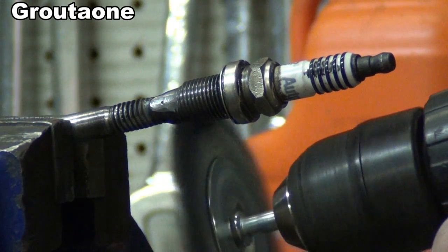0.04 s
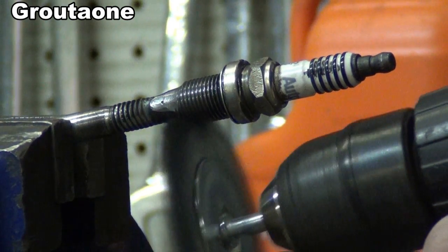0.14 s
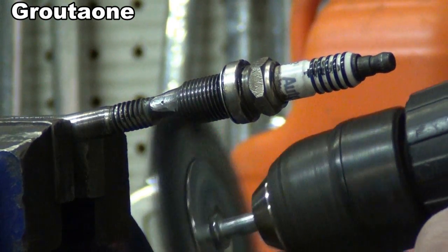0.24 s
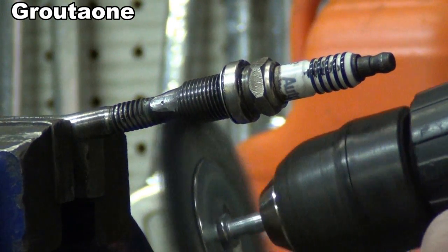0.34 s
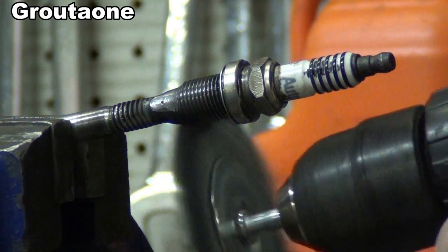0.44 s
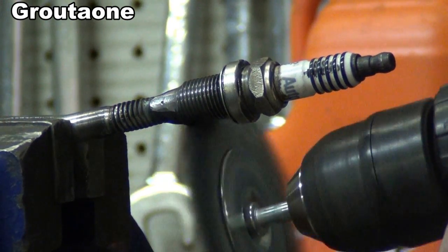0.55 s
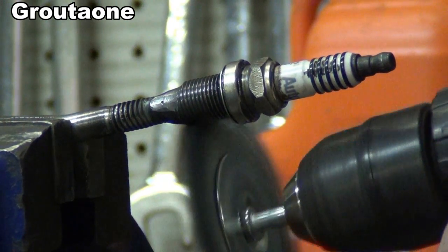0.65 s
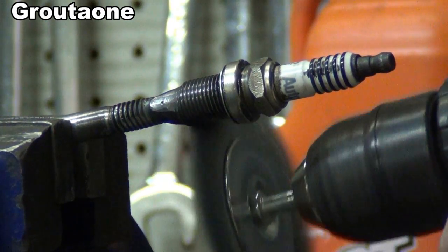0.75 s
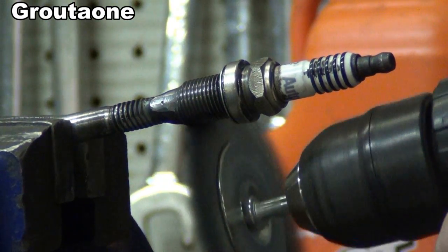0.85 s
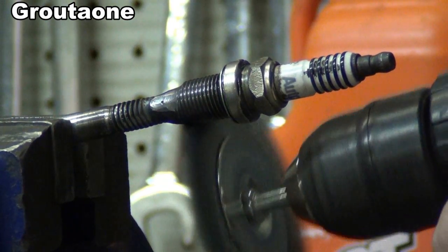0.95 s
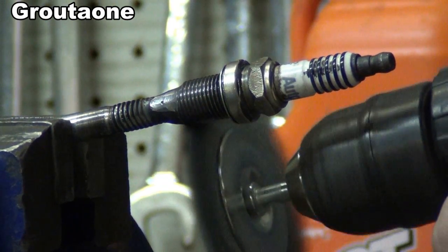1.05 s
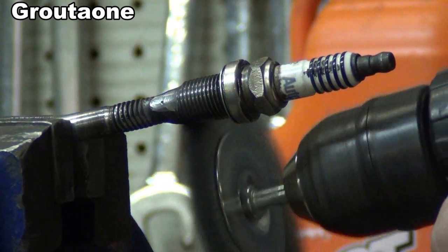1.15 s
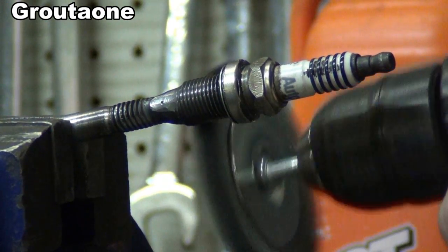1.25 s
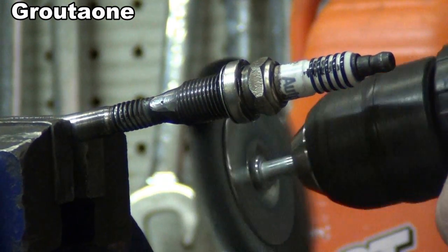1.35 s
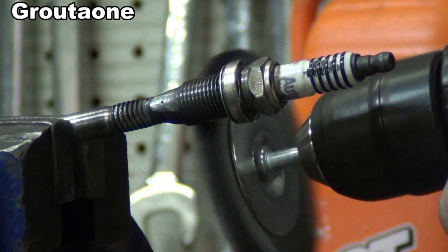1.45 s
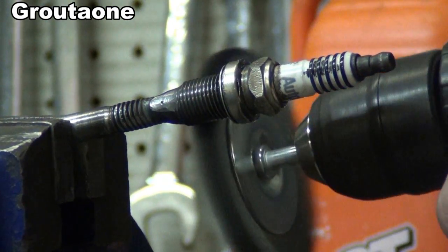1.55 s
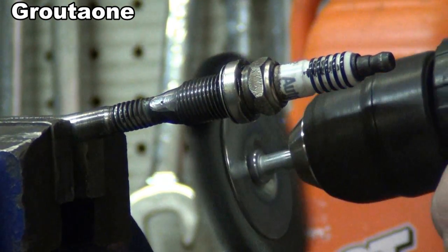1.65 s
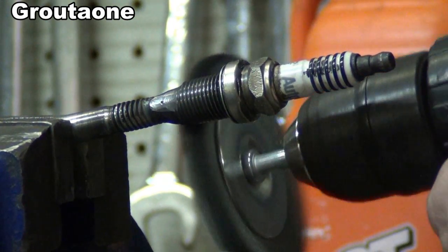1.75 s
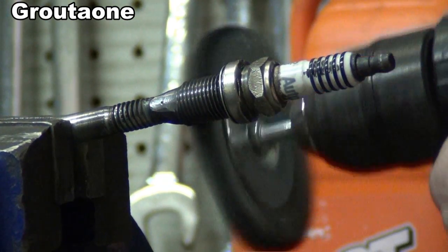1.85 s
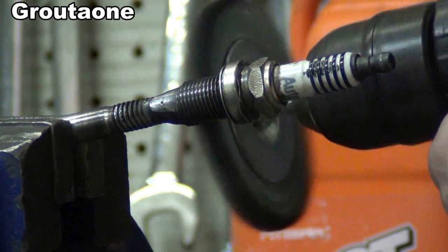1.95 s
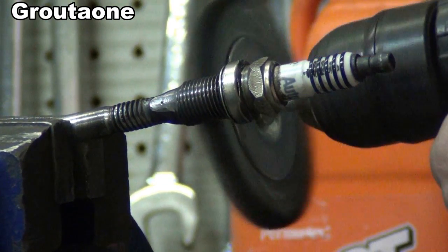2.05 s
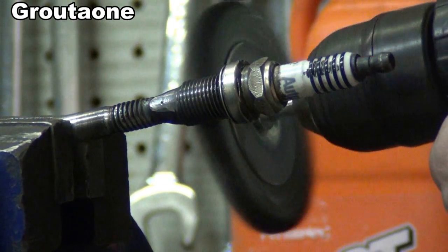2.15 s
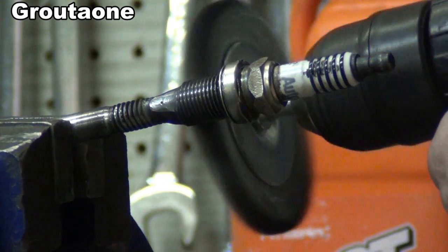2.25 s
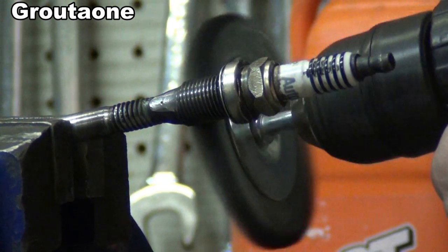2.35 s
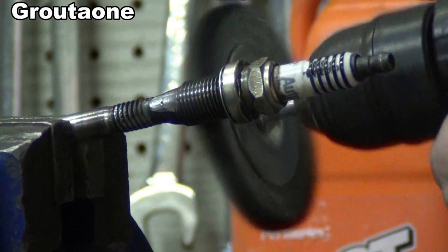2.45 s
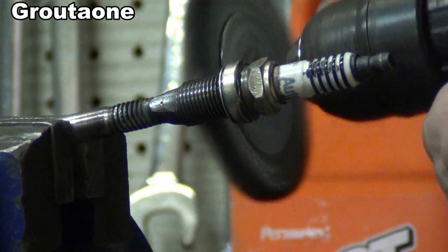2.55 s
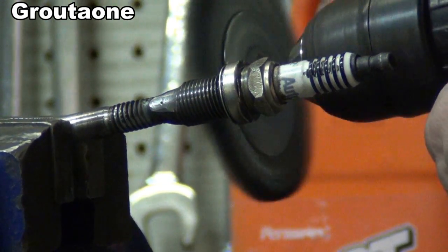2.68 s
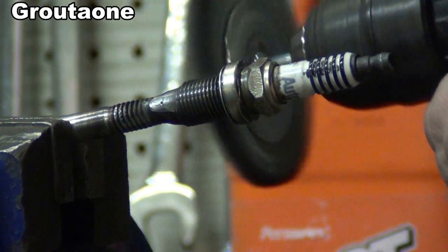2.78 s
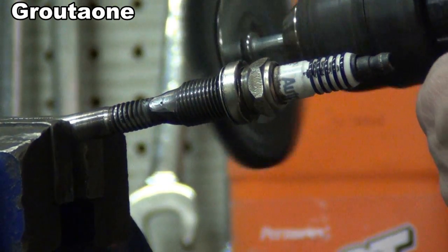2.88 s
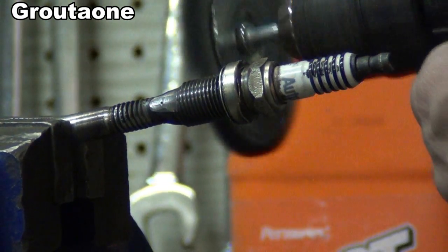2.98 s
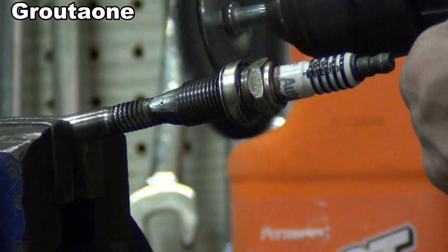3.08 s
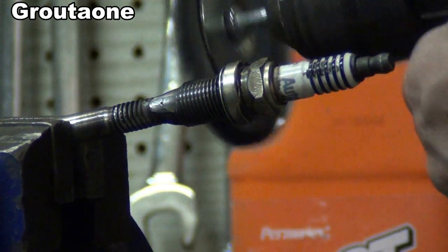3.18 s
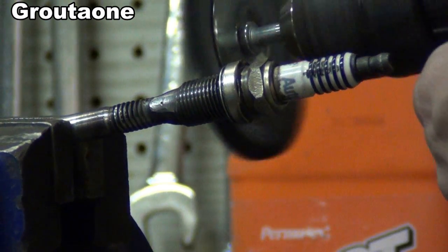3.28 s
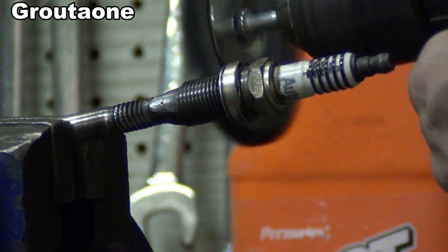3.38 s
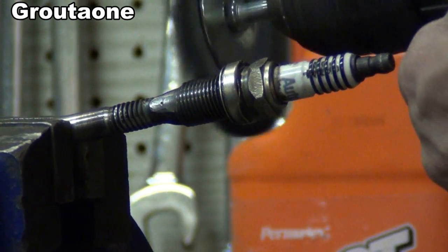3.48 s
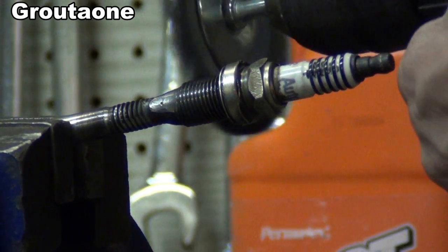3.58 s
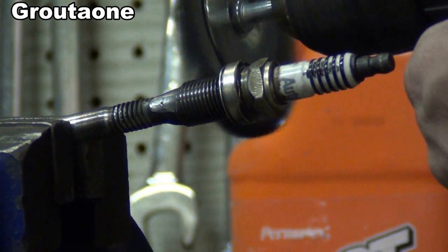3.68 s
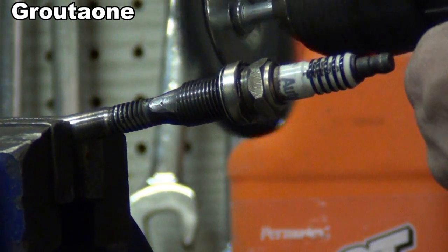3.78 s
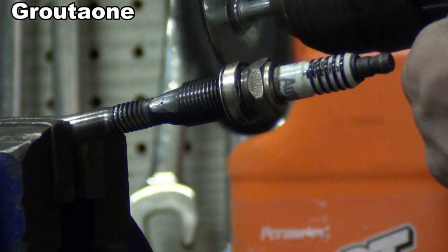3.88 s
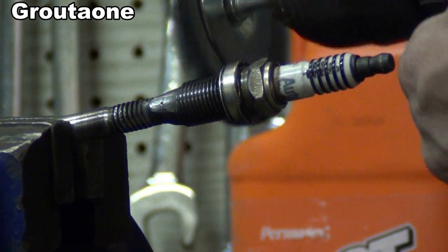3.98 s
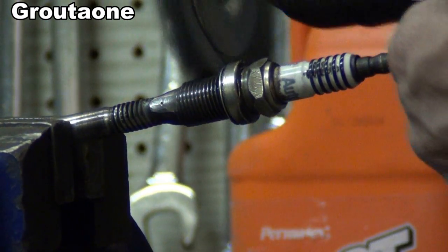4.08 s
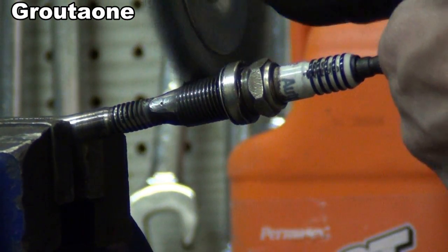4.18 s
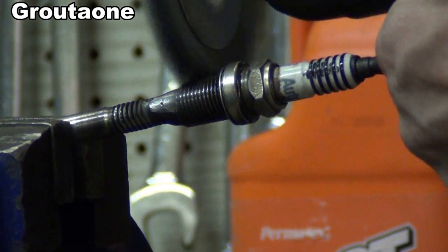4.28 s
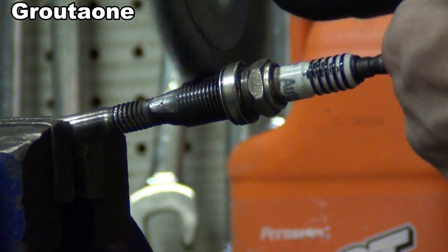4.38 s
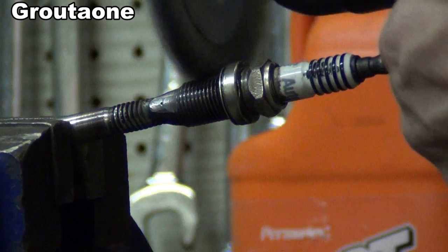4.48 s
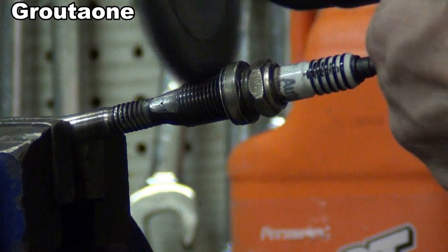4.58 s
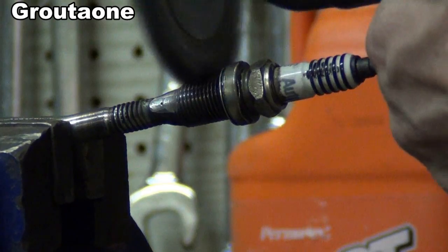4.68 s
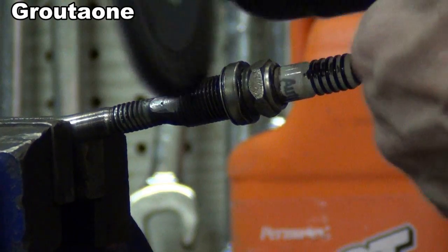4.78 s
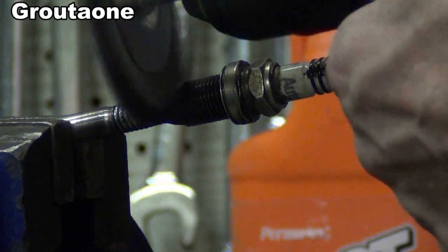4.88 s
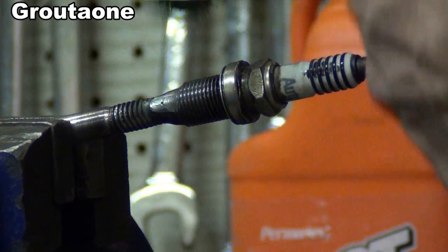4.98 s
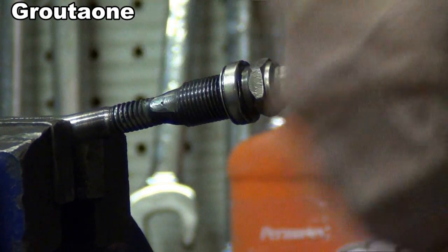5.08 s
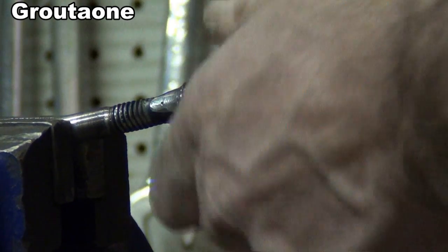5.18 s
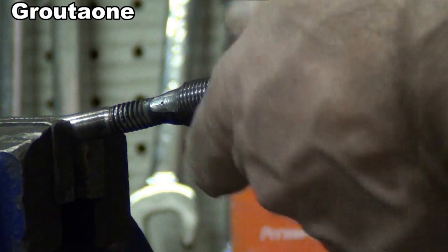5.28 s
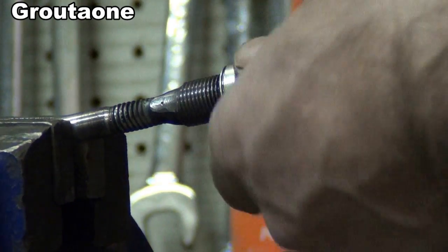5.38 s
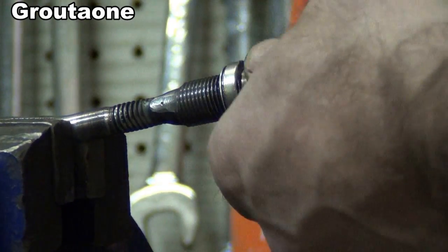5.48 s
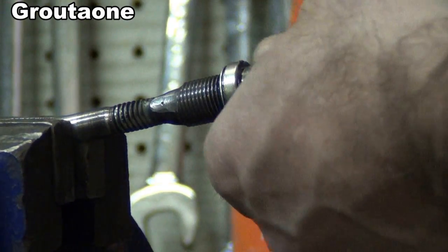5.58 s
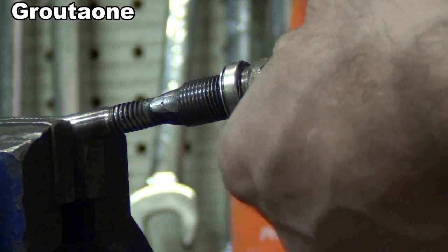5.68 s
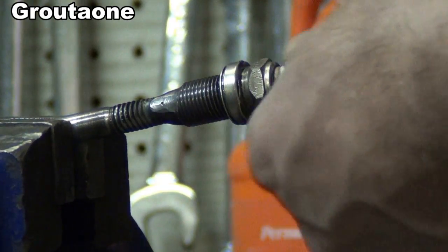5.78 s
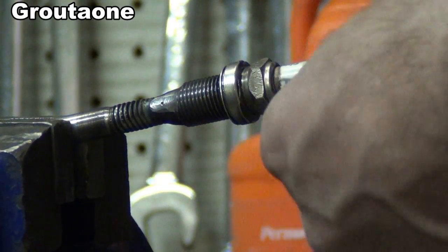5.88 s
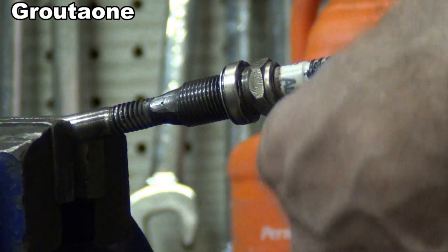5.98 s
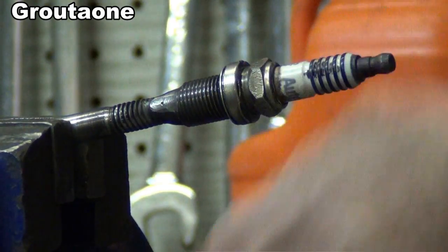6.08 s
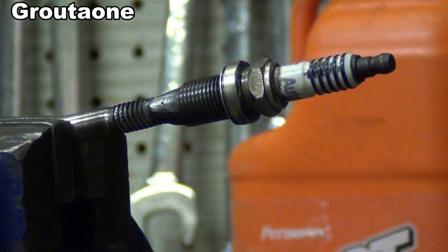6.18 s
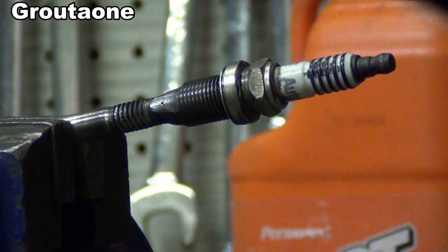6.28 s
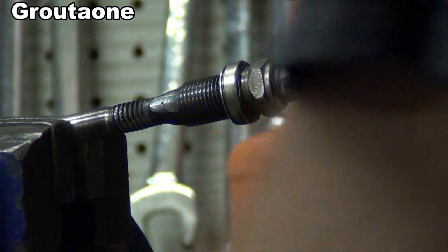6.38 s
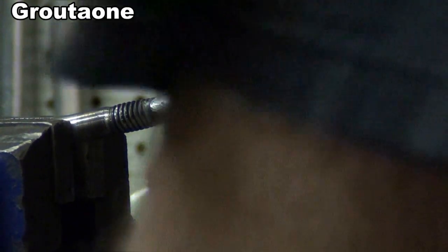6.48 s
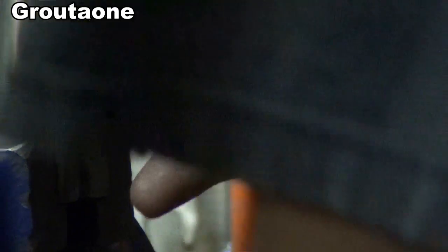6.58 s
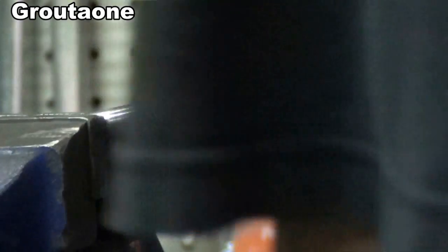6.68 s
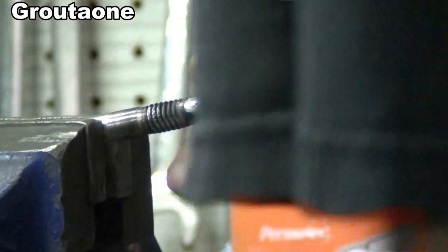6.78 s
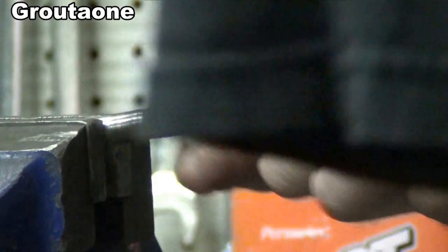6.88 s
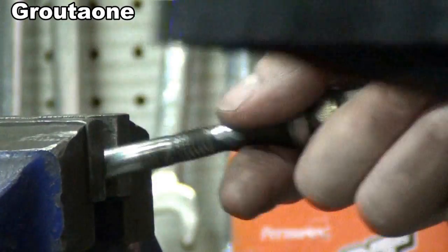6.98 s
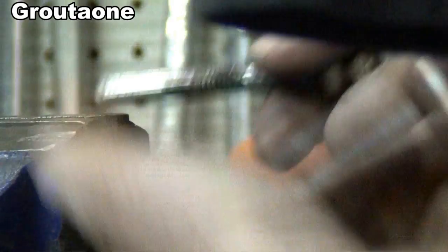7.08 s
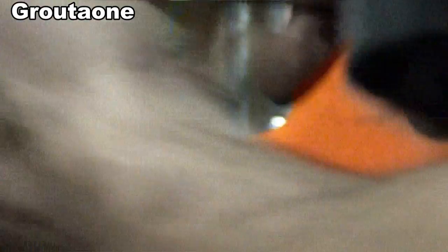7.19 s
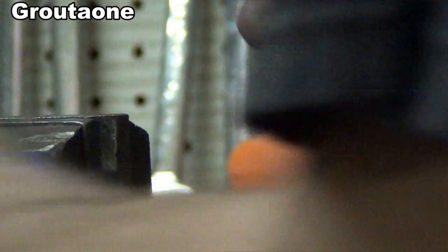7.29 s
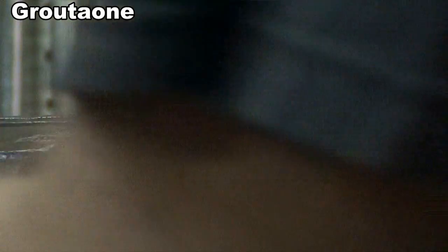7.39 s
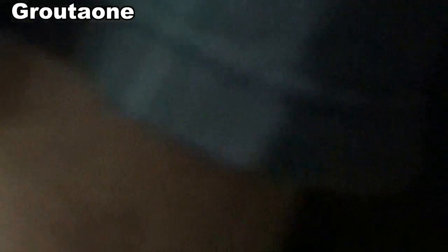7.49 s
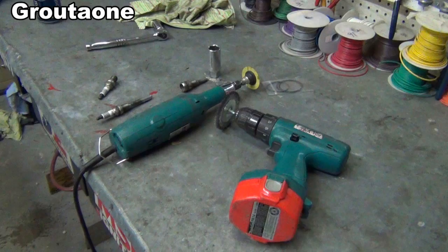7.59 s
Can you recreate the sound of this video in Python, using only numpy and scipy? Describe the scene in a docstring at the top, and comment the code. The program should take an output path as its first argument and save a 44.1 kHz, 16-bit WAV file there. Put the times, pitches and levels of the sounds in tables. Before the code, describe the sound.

In a small workshop, close up, a power drill runs at high speed with a wire wheel scratching steel threads. Its shrill whine and rushing noise sag in pitch at each press and recover. The motor cuts, the wheel scrapes a split second longer, then only faint machine hum remains. The drill is knocked down on the bench, followed by clacks, a sharp snap, thumps and a clanking steel vise.

```python
"""A power drill whines and scratches: its wire wheel spins against the threads of a spark plug in a vise.
The pitch sags each time the wheel is pressed on; then the trigger is let go and the drill runs out.
It is laid on the bench, things clack and thump in the small workshop, and the steel vise clanks open.
A machine hums faintly behind. Tones locked to the motor make the whine, shaped noise the rush and scratch;
each blow is a dying burst of noise, and the steel parts add ringing tones."""
import sys
import numpy as np
from scipy import signal
from scipy.fft import rfft, irfft
from scipy.io import wavfile

SR = 44100
rng = np.random.default_rng(int(sys.argv[2]) if len(sys.argv) > 2 else 0)


def put_to_file(sound):
    """Save the sound as 16-bit audio at rate SR, in the file named by the first command-line argument."""
    columns = np.atleast_2d(sound).T  # one column per channel
    safe = np.clip(columns, -1, 1)
    whole_steps = np.round(safe * 32767)
    wavfile.write(sys.argv[1], SR, whole_steps.astype(np.int16))


N = 336924
TIME = np.arange(N) / SR


def gain_of(db):
    """Turns decibels into a factor for the amplitude."""
    return 10 ** (np.asarray(db) / 20)


def evened(x):
    """Scales a sound to rms 1."""
    return x / np.sqrt(np.mean(x ** 2) + 1e-20)


def read(points, hz):
    """Reads a table between its points, along a log-frequency axis."""
    f, value = np.transpose(points)
    return np.interp(np.log(hz + 1), np.log(f + 1), value)


def curve(rows, column=1):
    """Draws one column of a timed table as straight lines, at every sample."""
    rows = np.array(rows)
    return np.interp(TIME, rows[:, 0], rows[:, column])


def add(mix, s, sound):
    """Mixes a sound in at a given second."""
    part = mix[round(s * SR):][:len(sound)]
    part += sound[:len(part)]


def coloured(x, points, tilt=0):
    """Filters x by a spectrum, tilted in dB per octave (gently below 300 Hz), and scales it to rms 1."""
    hz = np.fft.rfftfreq(len(x), 1 / SR)
    gain = gain_of(read(points, hz) + tilt * np.log2(1 + hz / 300))
    return evened(irfft(rfft(x) * gain, len(x)))


def wander(hz):
    """Random drift of rms 1 that changes up to about the given rate."""
    f = np.fft.rfftfreq(N, 1 / SR)
    return evened(irfft(rfft(rng.standard_normal(N)) * np.exp(-(f / hz) ** 2), N))


def ramp(start_s, length_s):
    """A smooth step from 0 to 1."""
    u = np.clip((TIME - start_s) / length_s, 0, 1)
    return u * u * (3 - 2 * u)


def tone(turns, order, flutter, flutter_hz):
    """A tone of so many cycles per turn; random changes of size and phase make it flutter."""
    sway = 1 + flutter * (wander(flutter_hz) + 1j * wander(flutter_hz))
    return evened((sway * np.exp(2j * np.pi * order * turns)).real)


# how long the room's echo takes to fall by 60 dB: (f/Hz, time/s)
ROOM_DECAY = [(100, .36), (500, .45), (2000, .5), (5000, .44), (10000, .32), (15000, .22)]


def room(x, wet_db):
    """Adds a tail of scattered echoes whose treble dies first, balanced to keep the power."""
    size = SR * 3 // 4
    echoes = rng.random(size) < 6000 / SR  # about 6000 echoes per second
    late = np.arange(size) > .003 * SR
    taps = rng.standard_normal(size) * echoes * late
    hz, t, z = signal.stft(taps, SR, nperseg=256)
    decay = gain_of(-60 * t / read(ROOM_DECAY, hz)[:, None])
    tail = signal.istft(z * decay, SR, nperseg=256)[1]
    wet = gain_of(wet_db)
    echoed = signal.fftconvolve(x, tail / np.linalg.norm(tail))[:N]
    return (x + wet * echoed) / np.sqrt(1 + wet ** 2)


# colour of the room air: (f/Hz, level/dB per Hz)
AIR_COLOUR = [(15, -40), (35, 5), (55, -0.5), (150, -0.5), (300, 0.5), (400, -1), (550, -3), (900, 3.5),
              (1200, -1), (2000, -6.5), (2600, -8), (5000, -13.5), (8000, -17.5), (10500, -16),
              (15500, -24)]
# steady hum of the distant machine: (f/Hz, level/dB)
MACHINE_HUM = [(120, -64.5), (360.5, -54.5), (479.3, -54), (808, -61), (910, -55.5)]


def shop(air_db=-44, chirp_db=-56, chirp_hz=1992, shaft_hz=30):
    """Room air is shaped noise; a distant machine hums in steady tones and chirps once in each turn."""
    hum = sum(gain_of(db) * evened(np.sin(2 * np.pi * hz * TIME + 0.36 * wander(5.4)))
              for hz, db in MACHINE_HUM)
    rub = np.exp(2 * np.cos(2 * np.pi * shaft_hz * TIME))  # one peak per turn
    chirp = gain_of(chirp_db) * evened(rub * tone(TIME, chirp_hz, flutter=0.98, flutter_hz=60.5))
    air = gain_of(air_db) * coloured(rng.standard_normal(N), AIR_COLOUR)
    return hum + chirp + air


# hand and sleeve sliding over the tools: (loudest at t/s, level/dB, swell/s, fade/s)
SLIDE_STROKES = [(6.031, -36.5, 0.17, 0.08), (6.805, -33, 0.038, .03)]
# colour of the rub: (f/Hz, level/dB per Hz)
SLIDE_COLOUR = [(200, -1), (900, 2.5), (2500, -4), (5500, -6), (7800, -15), (10500, -6), (15000, -33)]


def slides():
    """Each slide of hand and sleeve is a grainy rub that swells and fades."""
    strokes = np.zeros(N)
    for s, db, swell, fade in SLIDE_STROKES:
        side_s = np.where(TIME < s, swell, fade)
        strokes += gain_of(db) * np.exp(-((TIME - s) / side_s) ** 2)
    grain = gain_of(2 * wander(150))
    return strokes * coloured(rng.standard_normal(N) * grain, SLIDE_COLOUR)


def blows(rows, colour, modes=(), ring_db=0, ring_s=.4, damping_hz=3000):
    """Each blow is a dying burst of contact noise; its tilt brightens or dulls the burst and the ringing."""
    out, t = np.zeros(N), np.arange(SR // 2) / SR
    for s, db, tilt, contact_s in rows:
        sound = coloured(rng.standard_normal(len(t)), colour, tilt) * np.exp(-t / contact_s)
        if len(modes):
            hz, mode_db = np.transpose(modes)[:, :, None]
            size = gain_of(mode_db + tilt * np.log2(hz))
            t60 = ring_s / (1 + hz / damping_hz)  # high modes die first
            # a loose part rings a little differently each time
            loose = hz * (1 + 0.00074 * rng.standard_normal(hz.shape))
            wave = np.sin(2 * np.pi * (loose * t + rng.random(hz.shape)))
            ring = (size * gain_of(-60 * t / t60) * wave).sum(0) / np.linalg.norm(size)
            # the ring builds up while the contact lasts
            sound += gain_of(ring_db) * ring * (1 - np.exp(-4 * t / contact_s))
        add(out, s, gain_of(db) * sound)
    return out


# the drill touching the bench: (t/s, level/dB, tilt/dB per octave, contact/s)
SET_DOWN_BLOWS = [(5.657, -12.5, 1.5, 0.035), (5.686, -9, 5, 0.0075), (5.705, -13.5, -4.5, 0.032),
                  (5.731, -13.5, 10, .002), (5.751, -16, 3, 0.013)]
# its colour: (f/Hz, level/dB per Hz)
SET_DOWN_COLOUR = [(40, -26), (80, -18), (120, -13), (190, -18), (263, 8.5), (321, -12), (420, -3),
                   (880, -3), (1100, -7), (2640, -16), (7300, -30), (10100, -29), (15000, -49)]


def set_down():
    """The drill is laid on the bench: several noise bursts in a row."""
    return room(blows(SET_DOWN_BLOWS, SET_DOWN_COLOUR), wet_db=-5.5)


# thumps: (t/s, level/dB, tilt/dB per octave, contact/s)
THUMP_BLOWS = [(6.794, -23, 9, 0.0084), (6.802, -15, 6.5, 0.019), (6.814, -7.5, -3, 0.0038),
               (6.821, -7.5, -0.5, 0.031), (6.85, -20, 0, 0.11)]
# their colour: (f/Hz, level/dB per Hz)
THUMP_COLOUR = [(15, -46), (30, -27), (48, 0), (100, -2), (160, -7), (230, 3.5), (350, 0), (500, -2.5),
                (811, -5), (1210, -8), (2430, -9.5), (3350, -22.5), (5570, -22.5), (7480, -37),
                (10000, -25.5), (15000, -63)]


def thumps():
    """Thumps: noise bursts with strong bass, fairly dry."""
    return room(blows(THUMP_BLOWS, THUMP_COLOUR), wet_db=-12)


# one snap: (t/s, level/dB, tilt/dB per octave, contact/s)
SNAP_BLOW = [(6.371, -7.5, 0, 0.019)]
# its colour: (f/Hz, level/dB per Hz)
SNAP_COLOUR = [(180, -67), (300, -35), (581, -37), (685, -25), (922, -26), (1030, -15), (1240, -12),
               (1540, -12), (1810, -4), (3130, -11), (5950, -3), (8140, -12.5), (10100, 1), (15500, -16)]


def snap():
    """A bright snap across the bench: more room echo than direct sound."""
    return room(blows(SNAP_BLOW, SNAP_COLOUR), wet_db=3)


# clacks: (t/s, level/dB, tilt/dB per octave, contact/s)
CLACK_BLOWS = [(5.921, -21.5, 2, 0.004), (5.988, -28.5, -5, 0.0035), (6.938, -13.5, -5.5, 0.0043),
               (7.0, -30, -6, .002), (7.202, -25, -8, 0.0011)]
# their colour: (f/Hz, level/dB per Hz)
CLACK_COLOUR = [(400, -9), (2200, -2), (3000, -3), (4400, 3), (7500, -8), (10500, -4), (15000, -22)]


def clacks():
    """Clacks: very short contacts without ringing."""
    return room(blows(CLACK_BLOWS, CLACK_COLOUR), wet_db=-6)


# clanks: (t/s, level/dB, tilt/dB per octave, contact/s)
CLANK_BLOWS = [(6.617, -20.5, -3.5, 0.0093), (6.634, -10.5, 1, 0.015)]
# their colour: (f/Hz, level/dB per Hz)
CLANK_COLOUR = [(150, -9), (600, -4), (1600, 2), (2300, 1.5), (3500, 3.5), (5800, -6), (7300, -9),
                (8300, -21), (10000, -5), (14000, -57)]
# ringing steel, before the tilt: (f/Hz, level/dB)
CLANK_MODES = [(841, 2), (882, -5), (1113, -21), (1580, -2), (1732, -5), (1893, 5.5), (2030, -8), (2730, 0),
               (2913, -5), (3172, -3), (3706, -5), (3917, -3), (5812, 6), (6390, -9)]


def clanks():
    """A loose steel tool is struck and rings briefly."""
    loose_tool = blows(CLANK_BLOWS, CLANK_COLOUR, CLANK_MODES, ring_db=4, ring_s=.13)
    return room(loose_tool, wet_db=-6.5)


# clinks: (t/s, level/dB, tilt/dB per octave, contact/s)
CLINK_BLOWS = [(7.073, -13, 0.0016, 0.0027), (7.082, -14.5, 0, 0.0049)]
# their colour: (f/Hz, level/dB per Hz)
CLINK_COLOUR = [(500, -33), (3000, -3), (4800, -16), (6100, 0), (7500, -13), (8900, 6), (11000, -4),
                (12500, -26)]
# ringing steel, before the tilt: (f/Hz, level/dB)
CLINK_MODES = [(6100, -15), (8850, 3), (10950, -1)]


def clinks():
    """High steel clinks: short contacts that wake a few high tones."""
    struck = blows(CLINK_BLOWS, CLINK_COLOUR, CLINK_MODES, ring_db=-0.5, ring_s=.2)
    return room(struck, wet_db=-12)


# blows of the vise handle: (t/s, level/dB, tilt/dB per octave, contact/s)
VISE_BLOWS = [(7.085, -21, -6, 0.035), (7.099, -15.5, -4, 0.01), (7.112, -12, 3, 0.012),
              (7.122, -10, -4, 0.017), (7.131, -9, 6, 0.004), (7.138, -11.5, -0.5, 0.0061)]
# their colour: (f/Hz, level/dB per Hz)
VISE_COLOUR = [(100, -40), (450, -27), (650, 7.5), (1400, 0), (1900, 7), (2700, -1.5), (4500, -8),
               (6200, -12), (7200, -10), (8400, -28), (9700, -11), (11500, -38), (14000, -52)]
# ringing steel, before the tilt: (f/Hz, level/dB)
VISE_MODES = [(312, -13), (627, 4.5), (652, -4.5), (890, -5), (931, -11), (1179, -16), (1212, -2.5),
              (1562, -1), (1586, -9), (1640, -4), (1689, -4), (1838, -2), (2166, 4.5), (2439, -10),
              (3063, -8), (3722, -5.5), (4237, -15), (4667, -13), (7100, -19), (9600, -14)]


def vise():
    """The steel vise clanks as it is opened: quick blows that ring many tones."""
    handle = blows(VISE_BLOWS, VISE_COLOUR, VISE_MODES, ring_db=5, ring_s=.19)
    return room(handle, wet_db=-3.5)


def bench():
    """All the handling noises together."""
    return set_down() + thumps() + snap() + clacks() + clanks() + clinks() + vise() + slides()


# the wheel is pressed on, then eased off:
# (start t/s, let-up t/s, sag of the motor/turns per second, time to ease off/s)
PRESSES = [(-.2, .41, 19.7, .17), (1, 1.34, 28, .13), (1.34, 1.7, 19.5, .13), (1.7, 1.83, 38, .32),
           (2.27, 3.08, 24.5, .14), (3.28, 3.41, 24, .14), (3.68, 4.1, 24, .14), (4.42, 4.64, 21, .14)]
BITE_S = .13  # time for the sag to set in


def sag():
    """Turns per second that the motor loses as the wheel is pressed on."""
    return sum(hz * ramp(start, BITE_S) * (1 - ramp(let_up, ease))
               for start, let_up, hz, ease in PRESSES)


# the wheel starts under the plug and climbs behind it: (t/s, share hidden 0-1)
HIDDEN = [(.55, 0.05), (1.5, 0.44), (2.3, 0.66)]


def level(rule, load, swell_db=0):
    """Gain that follows the load and the place of the wheel, and swells by chance in the unsteady hand."""
    free_db, loaded_db, hidden_db = rule
    steady_db = free_db + loaded_db * load + hidden_db * curve(HIDDEN)
    return gain_of(steady_db + swell_db * wander(3.6))


# fixed resonances of the housing and the clamped plug: (f/Hz, width/Hz before broadening, level/dB)
BODY_MODES = [(264, 18, -44), (370, 18, -38), (436, 30, -36), (615, 20, -38), (1240, 50, -33),
              (1480, 40, -38), (2200, 55, -34), (2738, 36, -29.5), (2950, 70, -33.5), (4130, 300, -28),
              (6280, 220, -33)]


def body(drive):
    """Vibration rings the fixed resonances of housing and plug."""
    f, spectrum = np.fft.rfftfreq(N, 1 / SR), rfft(drive)
    ringing = np.zeros(N)
    for hz, width, db in BODY_MODES:
        response = 1 / (1 + 1j * (f - hz) / (1.33 * width)) ** 2  # broadened by 1.33
        ringing += gain_of(db) * evened(irfft(spectrum * response, N))
    return ringing


# low tones as the drill is turned in the hand, before swells and load:
# (t/s, gear hum level/dB, third order level/dB, fourth order level/dB)
TONE_LEVELS = [(0, -31, -29.5, -32), (.65, -35, -30.5, -28), (1.15, -32, -28.5, -31.5),
               (1.45, -36, -51, -43), (1.9, -29, -36, -41), (2.05, -35.5, -22.5, -36),
               (2.7, -34.5, -26.5, -33), (4.05, -37, -26, -33), (4.4, -30, -28.5, -33)]
# weak shaft and gear tones: (multiple of the motor speed, level/dB)
WEAK_TONES = [(.855, -41), (1.025, -34), (3.485, -38), (4.845, -32.5), (5.16, -36), (7.015, -33)]
# whistle: (level/dB running free, dB added at full load, dB added behind the plug)
WHISTLE_LEVEL = (-25, 0, -2.4)
# multiples of the motor speed: gear hum, two motor orders, and the close pair of gear mesh and fan
GEAR_ORDER, THIRD_ORDER, FOURTH_ORDER, WHISTLE_ORDERS = 1.365, 2.99, 4.005, (9.7, 10)
FOURTH_LOAD_DB = 4.5  # the fourth order swells by this at full load


def whine(turns, wheel, load, beat=0.39, swell_db=1.16):
    """Gear hum, motor orders and fan whistle; motor and whistle beat with each turn of the wheel."""
    gear, third, fourth = (gain_of(curve(TONE_LEVELS, column=k) + swell_db * wander(4.3))
                           for k in (1, 2, 3))
    hum = gear * tone(turns, GEAR_ORDER, flutter=0.57, flutter_hz=14)
    motor = third * tone(turns, THIRD_ORDER, flutter=0.87, flutter_hz=30.4)
    fourth = fourth * gain_of(FOURTH_LOAD_DB * load)
    motor += fourth * tone(turns, FOURTH_ORDER, flutter=0.44, flutter_hz=25.6)
    # the fan and the gear mesh lie close together and fray
    strands = sum(tone(turns + .014 * wander(40), order, flutter=.6, flutter_hz=70)
                  for order in WHISTLE_ORDERS)
    whistle = level(WHISTLE_LEVEL, load, swell_db=0.16) * strands
    weak = sum(gain_of(db) * tone(turns, order, flutter=0.63, flutter_hz=27.7)
               for order, db in WEAK_TONES)
    return hum + (motor + whistle) * (1 + beat * wheel) + weak


# colours of the motor's rush, the wires' scratch and the shaking: (f/Hz, level/dB per Hz)
RUSH_COLOUR = [(150, -26), (260, -23.5), (400, -7), (700, -6), (1050, 2), (1400, -0.5), (2100, -3.5),
               (2450, -4), (2900, -1.5), (3500, -1.5), (4250, -0.5), (4900, -3.5), (6300, -2), (7200, -8.5),
               (12000, -16)]
SCRATCH_COLOUR = [(1000, -29), (4000, -19), (7300, -15), (8600, -8.5), (9700, -4), (10400, -2.5),
                  (11200, -4), (12000, -12), (13200, -12.5), (15700, -47.5)]
SHAKE_COLOUR = [(15, -48), (30, -26), (40, -5), (50, 0), (75, -23), (120, -1), (200, -7.5), (400, -13.5)]
# their levels: (level/dB running free, dB added at full load, dB added behind the plug)
RUSH_LEVEL = (-17, 0.92, -2.28)
SCRATCH_LEVEL = (-16, 0, -5.5)
SHAKE_LEVEL = (-44.5, 1.5, 0)
FREE_HZ, WARM_UP_HZ_PER_S = 437.2, 1.3  # motor turns per second running free, and their slow rise
FULL_SAG_HZ = 24  # sag that counts as full load
GEAR_RATIO = .0705  # wheel turns per motor turn
RELEASE_S, FADE_S = 4.99, 0.0034  # the trigger is let go; time constant of the tones' fade
STOP_S, RUN_OUT_S = 5.141, 0.0083  # the scraping ends; time constant of its fade
COAST_RUSH_DB, COAST_SCRATCH_DB = -4, -7.5  # drop once the power is off


def drill(wobble_db=-1.0, motor_throb=0.12, wires_per_s=9000, wire_spread_db=3):
    """Gear whine, the rush of the motor, and wire tips flicking off the threads."""
    lost_hz = sag()
    load = lost_hz / FULL_SAG_HZ
    speed = FREE_HZ + WARM_UP_HZ_PER_S * TIME - lost_hz
    turns = np.cumsum(speed * (1 + 0.00312 * wander(17.7))) / SR
    wheel = np.sin(2 * np.pi * GEAR_RATIO * turns)

    # the tones die with the power; the wheel scrapes on a moment longer
    powered = np.exp(-np.maximum(TIME - RELEASE_S, 0) / FADE_S)
    run_out = np.exp(-np.maximum(TIME - STOP_S, 0) / RUN_OUT_S)
    coasting = 1 - powered

    # the wheel runs slightly out of true and presses harder once in each turn
    contact = gain_of(wobble_db * wheel + .5 * wander(45))
    throb = 1 + motor_throb * np.sin(2 * np.pi * turns + 2.5 * wander(35))
    hits = rng.random(N) < wires_per_s / SR
    flicks = hits * rng.standard_normal(N) * gain_of(wire_spread_db * rng.random(N))

    rush = coloured(rng.standard_normal(N) * throb * contact, RUSH_COLOUR)
    rush = level(RUSH_LEVEL, load, swell_db=0.73) * rush
    scratch = coloured(flicks * throb * contact, SCRATCH_COLOUR)
    scratch = level(SCRATCH_LEVEL, load, swell_db=0.13) * scratch
    shake = level(SHAKE_LEVEL, load) * coloured(rng.standard_normal(N), SHAKE_COLOUR)

    noise = (rush + shake) * gain_of(COAST_RUSH_DB * coasting)
    noise += scratch * gain_of(COAST_SCRATCH_DB * coasting)
    ringing = body(rng.standard_normal(N) * contact) * (0.31 * run_out + 0.29 * powered)
    tones = whine(turns, wheel, load) * powered
    return room(tones, wet_db=-9) + room(noise * run_out + ringing, wet_db=-7.5)


def ports(mid, width):
    """Two close microphone ports; only scattered reflections differ between them."""
    hz, t = np.fft.rfftfreq(N, 1 / SR), np.arange(SR // 16) / SR
    scatter = rfft(rng.standard_normal(len(t)) * np.exp(-t / .012), N)
    phase = scatter / abs(scatter)
    side = irfft(rfft(mid) * phase * gain_of(read(width, hz)), N)
    return np.array([mid + side, mid - side])


# stereo width of the drill: (f/Hz, side-to-mid level/dB)
DRILL_WIDTH = [(60, -4), (160, -8), (270, -13.5), (450, -12.5), (740, -20.5), (1220, -31), (2010, -63),
               (3330, -24), (5200, -19), (6300, -11), (8000, -5), (9500, -13), (11500, -72)]
# stereo width of the handling noises and the shop: (f/Hz, side-to-mid level/dB)
SHOP_WIDTH = [(60, -20), (120, -12), (240, -16), (480, -17), (950, -19), (1890, -19.5), (3770, -26.5),
              (7520, -6), (15000, -35)]


def scene():
    """The drill, a hair to the right, and the handling noises over the sound of the shop."""
    lean_db = .08
    near = ports(drill(), DRILL_WIDTH) * gain_of([[-lean_db], [lean_db]])
    return near + ports(bench() + shop(), SHOP_WIDTH)


LOW_CUT_HZ, EDGE_HZ = 42, 15850  # lowest and highest pitch let through


def record(dry):
    """The microphone cuts the deepest bass and rounds off peaks near full scale; then the band limit."""
    low_cut = signal.butter(6, LOW_CUT_HZ, "high", fs=SR, output="sos")
    thinned = signal.sosfilt(low_cut, dry)
    limited = thinned / (1 + thinned ** 8) ** (1 / 8)
    band_limit = signal.firwin(511, EDGE_HZ, window=("kaiser", 9), fs=SR)
    return signal.oaconvolve(limited, band_limit[None], "same")


dry = scene()
out = record(dry)
put_to_file(out)
```